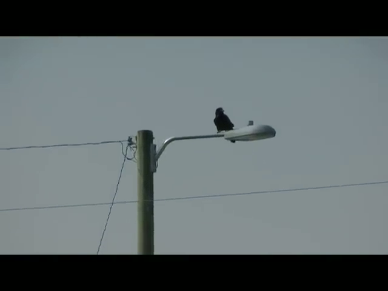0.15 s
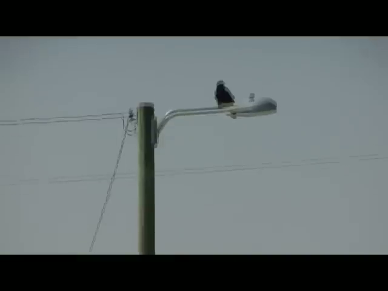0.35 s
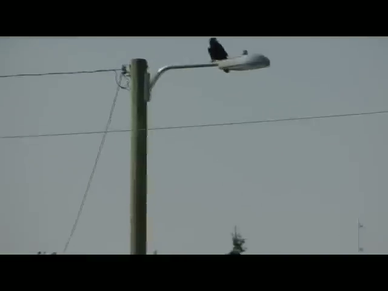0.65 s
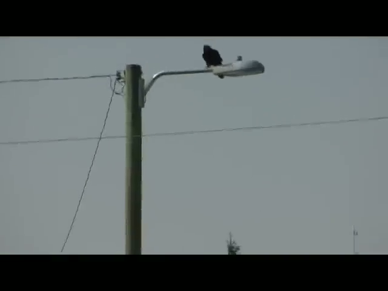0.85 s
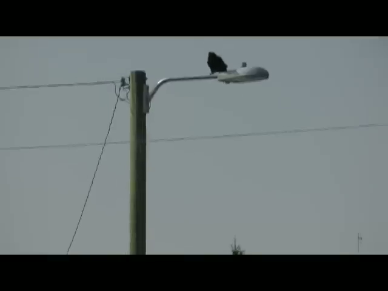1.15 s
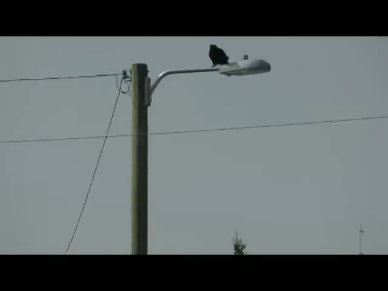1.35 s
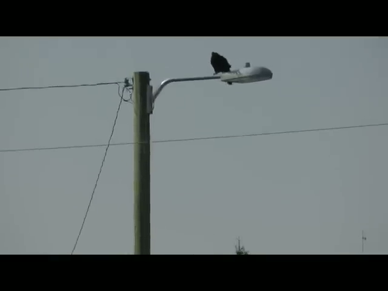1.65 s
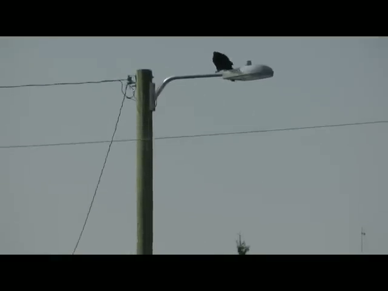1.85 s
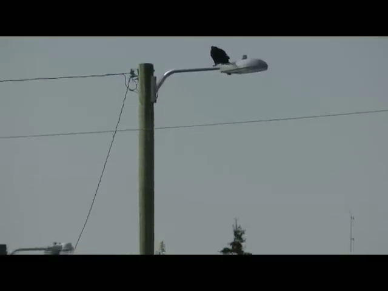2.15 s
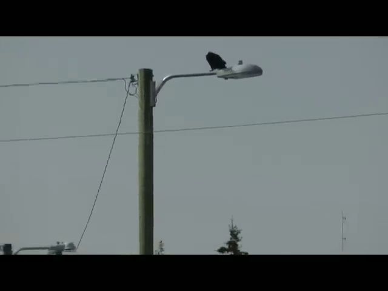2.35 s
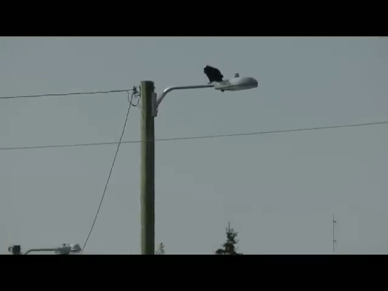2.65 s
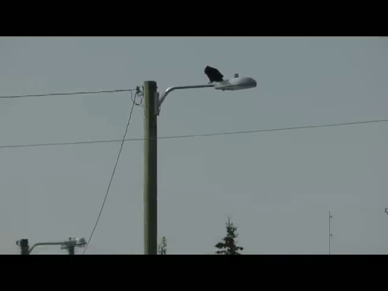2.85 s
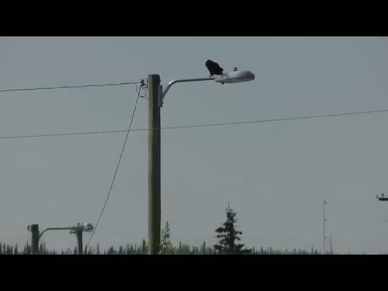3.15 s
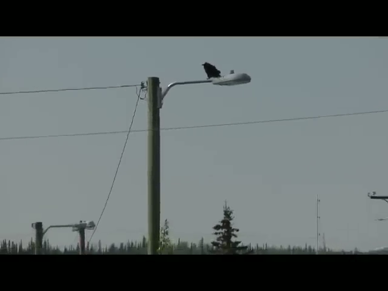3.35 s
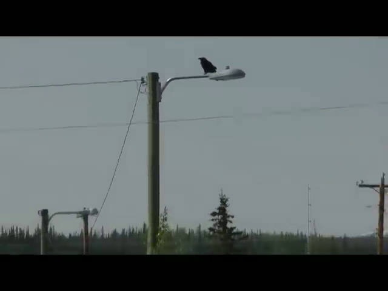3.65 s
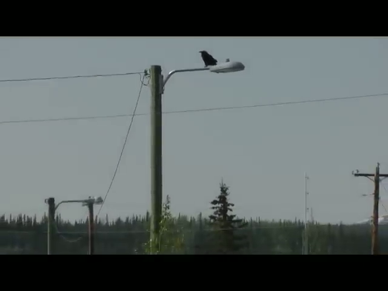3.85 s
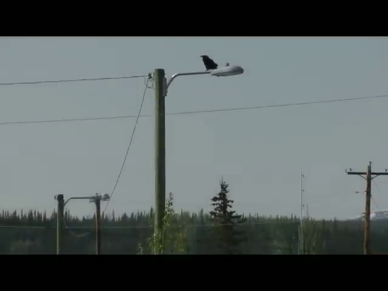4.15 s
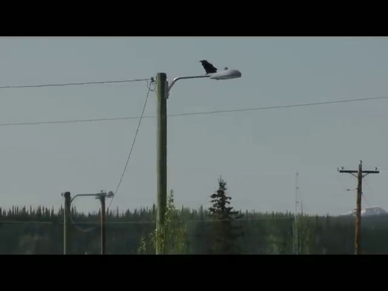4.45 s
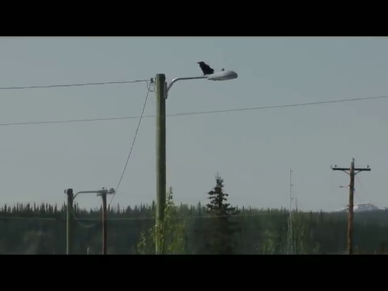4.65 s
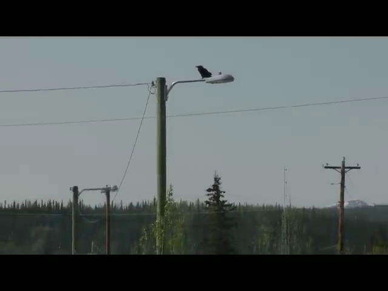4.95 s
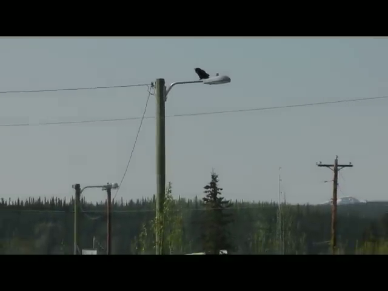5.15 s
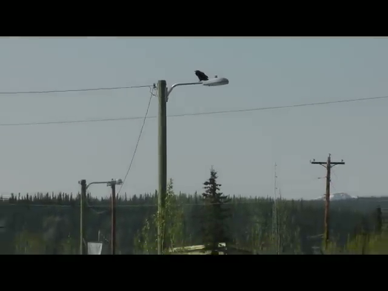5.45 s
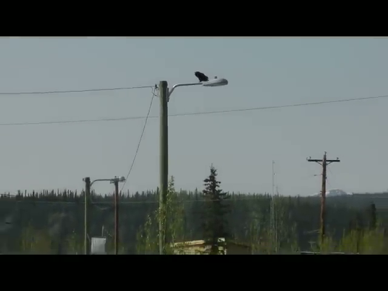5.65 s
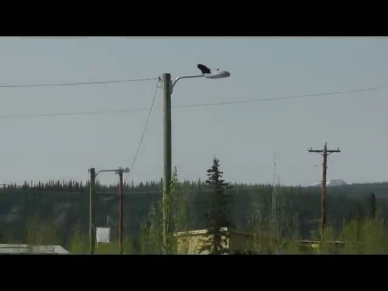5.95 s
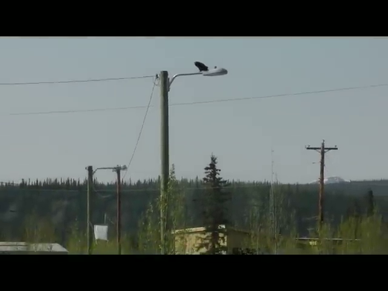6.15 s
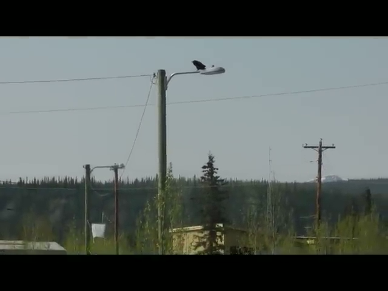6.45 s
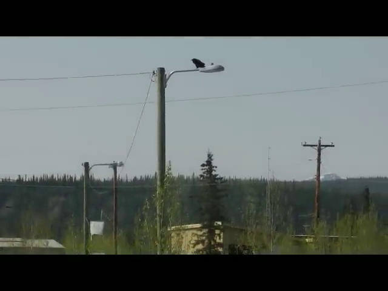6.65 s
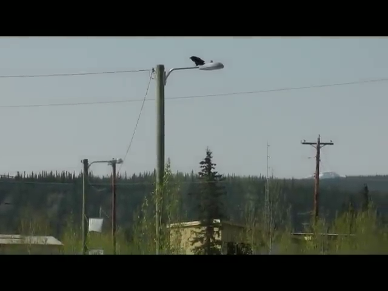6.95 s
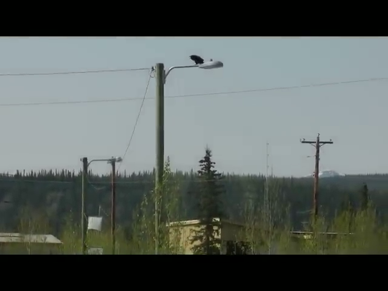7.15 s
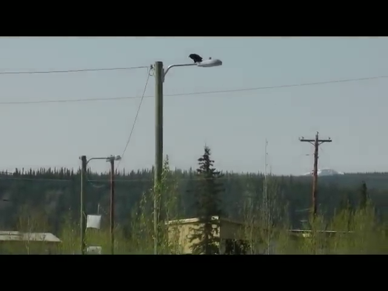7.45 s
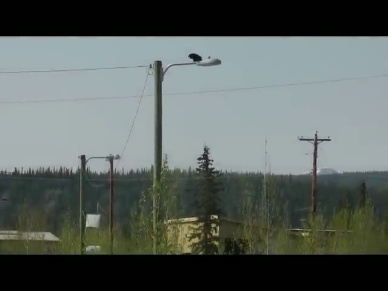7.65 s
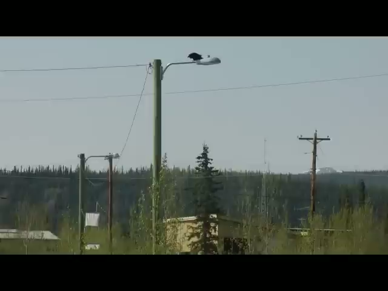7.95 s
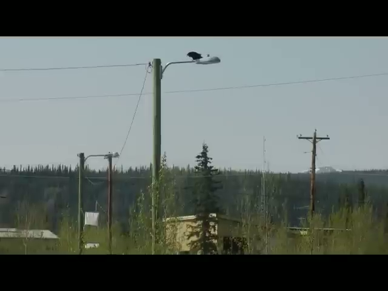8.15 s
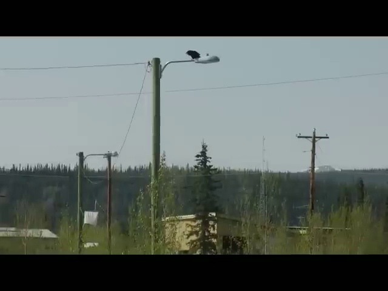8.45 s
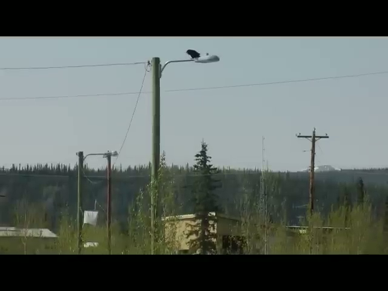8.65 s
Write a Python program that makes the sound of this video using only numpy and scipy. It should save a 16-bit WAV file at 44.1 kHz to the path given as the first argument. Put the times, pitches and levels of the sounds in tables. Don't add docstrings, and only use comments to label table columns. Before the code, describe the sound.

A raven calls from some distance above a handheld stereo microphone, its voice followed by a faint scattered echo from buildings and woods. Paired nasal honks cluster early, with a deep croak before another pair; a calm gap follows, then higher honks, another deep croak, low honks and two strong high rattles. Beneath lie traffic rumble, hiss, rustling leaves, wind bumps, tiny handling creaks and a distant engine rising late.

```python
import sys
import numpy as np
from scipy import signal
from scipy.fft import rfft, irfft, next_fast_len
from scipy.io import wavfile
from scipy.ndimage import uniform_filter1d

SR = 44100
rng = np.random.default_rng(int(sys.argv[2]) if len(sys.argv) > 2 else 0)


def ratio_of_db(decibels):
    return 10 ** (np.asarray(decibels, float) / 20)


def store_wav(level_fs):
    pcm = np.round(np.clip(np.atleast_2d(level_fs), -1, 1) * 32767)
    wavfile.write(sys.argv[1], SR, pcm.T.astype(np.int16))


N = 388962
TIME = np.arange(N) / SR

# t/s, pitch f/Hz, 1st partial level/dB, 2nd partial level/dB
HONKS = [
    [(1.053, 736, -64, -65), (1.065, 744, -45, -34.5), (1.073, 758, -44, -33), (1.093, 763, -41, -34.5),
     (1.102, 744, -43, -32.5), (1.107, 721, -48, -29), (1.114, 716, -43.5, -35.5), (1.143, 697, -56, -53)],
    [(1.171, 720, -63, -57), (1.175, 702, -49, -43), (1.182, 711, -47, -33.5), (1.194, 742, -45.5, -30.5),
     (1.203, 740, -46, -33), (1.207, 736, -47, -35), (1.212, 720, -53, -47), (1.216, 706, -64, -48)],
    [(1.654, 620, -63, -63), (1.668, 690, -50, -39.5), (1.678, 706, -43, -27.5),
     (1.693, 715.4, -42.5, -25.5), (1.706, 742, -40.5, -26.5), (1.717, 741, -41.5, -25.5),
     (1.726, 710, -45.5, -37), (1.737, 676, -61, -52)],
    [(1.76, 701, -52, -52), (1.77, 704, -48.5, -37), (1.774, 703, -52, -43), (1.783, 747, -43, -41),
     (1.793, 751, -40.5, -25.5), (1.797, 750, -41.5, -32), (1.814, 732, -49, -33), (1.831, 696, -62, -52)],
    [(2.158, 807, -57, -60), (2.164, 823, -50, -55), (2.168, 832.5, -44.5, -48), (2.181, 814, -38, -33.5),
     (2.194, 822, -38, -27.5), (2.204, 789, -38.5, -34.5), (2.208, 780, -39, -33.5), (2.24, 734, -67, -62)],
    [(2.272, 800, -61, -52), (2.285, 772, -43, -33), (2.289, 744, -45.5, -44), (2.3, 833, -39, -31.5),
     (2.309, 834, -40, -24.5), (2.316, 830, -39.5, -27), (2.325, 782, -46.5, -56), (2.33, 769, -53, -46)],
    [(3.142, 654, -57, -65), (3.156, 649, -53, -48), (3.162, 674, -56, -46), (3.169, 705, -46, -42),
     (3.187, 690, -43.5, -31.5), (3.201, 711, -42, -32.5), (3.207, 714, -45, -33), (3.232, 704, -64, -41)],
    [(3.281, 731, -64, -64), (3.287, 733, -52, -51), (3.291, 756, -47, -46), (3.302, 775, -43, -48),
     (3.306, 770, -45.5, -41.5), (3.318, 729, -49, -43), (3.322, 718, -52, -48), (3.328, 719, -62, -45)],
    [(5.546, 874, -60, -72), (5.554, 834, -48, -35.5), (5.558, 817, -43, -34.5), (5.565, 795, -42, -42),
     (5.569, 791.6, -40, -39), (5.59, 807, -42, -39.5), (5.603, 796, -40, -54), (5.625, 770, -66, -66)],
    [(5.651, 777, -63, -50), (5.657, 760, -53, -45), (5.662, 772, -46, -40), (5.666, 777, -44, -38),
     (5.672, 771, -39.5, -43), (5.68, 749, -43, -33), (5.701, 745, -53, -43.5), (5.713, 740, -62, -51)],
    [(6.451, 735, -64, -67), (6.457, 628, -47.5, -44.5), (6.463, 626, -49, -42), (6.468, 640, -49.5, -58),
     (6.488, 667, -56, -47), (6.504, 645, -55, -49), (6.511, 626, -62, -41), (6.515, 624, -73, -59)],
    [(6.531, 656, -62, -54), (6.535, 701.6, -54, -63), (6.579, 738, -42, -33), (6.585, 758.5, -41, -33.5),
     (6.589, 758.5, -41, -37.5), (6.605, 739, -46, -30.5), (6.609, 748, -47, -31), (6.622, 677, -51, -43)],]
# level over the 1st partial/dB, drift from start to end/dB
HONK_BRIGHTNESS = [(-13.5, -9), (-7.5, -6), (-3, 7), (-2, 1), (-5.5, -15), (-4, 6), (-8.5, 0), (-13.5, 0),
                   (-13, -20), (-16.5, -5), (-5.5, -8), (-18, 25)]
# level/dB of the 3rd, 4th, 5th .. partial
HONK_COLOURS = [(0, -8, -16, -21, -20, -27, -24), (0, -4, -20, -20, -20, -16, -19),
                (0, -6, -20, -22, -25, -20, -18), (0, -3, -23, -29, -26, -19, -25),
                (-3, 0, -14, -18, -26, -30, -30), (0, -2, -10, -16, -30, -30, -30),
                (0, -9, 0, -6, -22, -22, -28), (0, -7, -6, -9, -29, -30, -28),
                (-2, 0, -10, -19, -30, -30, -30), (0, -3, -25, -22, -30, -25, -30),
                (-1, 0, -22, -30, -30, -21, -21), (0, -2, -12, -24, -22, -20, -23)]
# f/Hz, width/Hz, level/dB
HONK_THROAT = [(2300, 700, 0), (3300, 900, -2), (4600, 900, -6)]
# t/s, attack/s, hold/s, release/s, 2nd partial level/dB
COOS = [
    (7.535, 0.052, 0.017, .08, -60),
    (8.738, 0.0092, 0.0476, 0.04, -76),
]
# first f/Hz, crest f/Hz, last f/Hz, 1st partial level/dB, higher partials level/dB
COO_TUNES = [(654, 622, 564, -46, -67), (770, 680, 700, -38.5, -64)]
# level/dB of the 3rd, 4th .. partial
COO_COLOURS = [(-0.72, 0, -12, -12, -25, -25, -30), (-1, 0, -10, -14, -20, -30, -30)]
DEEP_CROAKS = [
    (2.764, .006, .115, .02, -3),
    (6.044, .005, .105, .02, -3),
]
DEEP_TUNES = [(534, 520, 503, 1, -1.7), (566, 538, 505, 1, -0.99)]
DEEP_COLOURS = [(-9, -11, -6, 0, -12, -17, -12, -18, -12, -19, -24),
                (-1, -6, -2, 0, -6, -9, -14, -17, -20, -24, -27)]
STUTTER = [
    (6.0115, 0.00224, 0.038, 0.0074, 1.7),
]
STUTTER_TUNE = [(559, 580, 680, 3.4, -0.072)]
HIGH_CROAKS = [
    (7.384, .004, .15, .02, -3),
    (8.556, .004, .165, .015, -3),
]
HIGH_TUNES = [(715, 695, 670, -1, -2.3), (751, 733, 733, -0.5, -1.8)]
HIGH_COLOURS = [(-6, 0, -12, -17, -27, -30, -30), (-3, 0, -7, -7, -18, -20, -27)]
# f/Hz, width/Hz, level/dB
DEEP_THROAT = [
    [(1627, 460, -12), (2540, 290, -2), (3150, 240, 0.5), (4640, 230, -10), (5600, 420, -9.5),
     (7630, 4100, -15)],
    [(1103, 270, -4), (1514, 530, -3), (2490, 300, -3.5), (3290, 310, -3), (4500, 580, -12),
     (5570, 600, -19)],
]
HIGH_THROAT = [
    [(950, 330, 0), (1750, 150, -1.5), (2580, 350, 5.5), (3500, 520, -3), (4000, 230, -14)],
    [(1050, 240, -19), (1800, 260, -5.5), (2660, 370, 0), (3650, 560, -6), (4160, 160, -6),
     (6000, 490, -19.5)],
]
# snap t/s, tone delay/s, 1st partial level/dB, 2nd level/dB, higher level/dB
DEEP_BEATS = [(2.771, .005, -54, -33, -42), (2.784, .009, -52, -33, -37), (2.7977, .007, -51, -32, -36),
              (2.8087, .006, -50, -34, -37), (2.8227, .008, -51, -30.5, -36), (2.8372, .004, -51, -31, -38),
              (2.849, .007, -53, -29, -40), (2.8643, .005, -60, -34, -45), (2.876, .005, -62, -43, -52),
              (6.0156, .0015, -47, -42, -39), (6.0307, .0011, -46, -42, -38), (6.041, .0022, -50, -45, -47),
              (6.0535, .0065, -50, -36, -39), (6.066, .008, -47, -33.5, -38), (6.0795, .003, -47, -34, -42),
              (6.0927, .008, -49, -29, -42), (6.1086, .004, -49, -29.5, -43), (6.12, .01, -53, -35, -49),
              (6.134, .006, -55, -41, -52), (6.15, .004, -58, -46, -58)]
HIGH_BEATS = [(7.391, .001, -38.5, -42, -58), (7.4086, .001, -38, -38, -44), (7.422, .001, -48, -50, -49),
              (7.4315, .002, -40, -39, -43), (7.4492, .001, -37, -34, -39), (7.4678, .0013, -38, -38, -43),
              (7.4867, .0005, -38, -35, -44), (7.5062, .002, -40, -41, -46), (7.519, -.0013, -52, -41, -50),
              (7.534, .003, -48, -48, -52), (8.563, .0014, -43, -40, -54), (8.5787, 0, -37, -32, -50),
              (8.5935, .0035, -36, -30, -38.5), (8.6106, .004, -38, -35, -37),
              (8.6238, .002, -35, -29, -38), (8.6367, .002, -37, -29, -35), (8.6509, 0, -38, -29, -36),
              (8.658, 0, -39, -36, -48), (8.670, .0033, -34, -27, -33.5), (8.6915, .002, -36, -29, -36),
              (8.7067, .004, -55, -47, -46), (8.724, -.002, -55, -39, -50)]
SWELL_SHARES = [
    [0.13],
    [0.13],
    [0.1],
]
FOLLOWS = (0.8, 1.4, 1.7)
# t/s, peak level/dB, f/Hz
KNOCKS = [
    (7.349, -43, 1700),
    (7.366, -42, 1720),
    (8.5527, -37.5, 1694),
    (8.559, -36.5, 1750),
]
# delay t/s, level/dB
ECHO = [(0, -21), (.03, -40.5), (.06, -32), (.15, -38.5), (.33, -42.5), (.7, -51), (2.2, -83)]
# f/Hz, level/dB
ECHO_COLOUR = [(400, -9.5), (750, -4.5), (1100, 3), (1400, 1.5), (1650, -6.5), (3000, -0.5), (6000, -12.5)]
# f/Hz, left over right level/dB, left phase lead/rad
PORTS = [(500, -8, .4), (750, -10, .5), (1050, -3, .25), (1500, -3, .55), (3000, -6.5, .15), (6000, -8, .4)]
# t/s, length/s, first f/Hz, last f/Hz, level/dB
CHIRPS = [
    (.335, .02, 3800, 3500, -71),
    (.555, .03, 3900, 3500, -71),
    (.715, .02, 4100, 3700, -70),
    (.765, .025, 3900, 3700, -69),
    (.89, .025, 3600, 3100, -67),
    (.93, .02, 3700, 2800, -69),
    (.975, .02, 3600, 3100, -70),
    (1.033, .025, 3700, 3100, -68),
]
# t/s, level/dB, length/s, low edge f/Hz, high edge f/Hz
CREAKS = [(0.016, -61, 0.0074, 1500, 5970), (0.154, -67, .015, 1800, 6000),
          (0.475, -64.5, 0.011, 1500, 2780), (0.518, -60, 0.023, 1410, 6150),
          (0.97, -62, 0.012, 2800, 8300), (1.13, -65.5, 0.048, 3500, 8600), (1.453, -65, 0.013, 1980, 8020),
          (1.614, -64, 0.028, 2940, 15160), (1.761, -50, 0.00092, 3960, 12000),
          (4.315, -65, 0.032, 2000, 6800), (4.818, -67.5, 0.043, 2540, 7040),
          (5.878, -55, 0.014, 1514, 11000), (6.232, -54, 0.0028, 2000, 4200),
          (7.152, -66.5, 0.04, 3000, 10500)]
# f/Hz, width/Hz, left level/dB, right level/dB
WHINE = [(426, 3., -72, -66.5), (855, 1.5, -77, -65)]
# t/s, firing f/Hz, level/dB
ENGINE = [
    (5.5, 52.3, -73),
    (6.05, 63.5, -67.5),
    (8.82, 75.4, -61.5),
]
# multiple of firing rate, level/dB
ENGINE_ORDERS = [(1, -0.5), (1.5, -11), (2, -14)]
# t/s, f/Hz, level/dB
COASTING = [
    (6.65, 118.5, -63.5),
    (6.866, 103, -63.5),
    (7.25, 93.7, -64),
]
# t/s, level/dB
WIND = [(0.0, -84), (0.19, -88), (.28, -65.5), (.38, -83), (3.14, -89), (3.56, -61.5), (3.76, -80),
        (4.55, -83), (4.66, -57), (4.8, -86), (5.65, -91), (5.77, -70.5), (6.2, -70), (6.6, -78),
        (7.6, -74), (8.28, -81), (8.82, -67)]
# t/s, level/dB
LEAVES = [
    (0, -94),
    (.8, -72),
    (1.2, -65.5),
    (1.6, -68),
    (2.2, -80),
    (8.82, -74.5),
]
# f/Hz, density level/dB per Hz
FLOOR = [(24, -51), (40, -15), (75, -3), (154, -4.5), (295, -7.5), (419, -13), (860, -14.5), (950, -22.5),
         (1390, -20), (1700, -16), (3000, -19.5), (7000, -25), (9000, -26.5), (15700, -25.5)]
# f/Hz, left over right level/dB
FLOOR_BALANCE = [(60, -1), (400, 1), (700, -4), (1300, -4), (6500, -9), (8500, -3), (10500, -33),
                 (15000, -16)]
# f/Hz, left-right likeness (-1..1)
FLOOR_LIKENESS = [(60, 0.56), (130, 0.55), (290, -0.22), (640, -0.33), (1410, 0.076), (3100, 0.068),
                  (6820, 0.0053), (15000, 0.57)]


def raven():
    honks = voice(honked(HONKS, HONK_BRIGHTNESS), HONK_COLOURS,
                  throats=[HONK_THROAT] * len(HONK_COLOURS), air_db=-20.5)
    coos = voice(sung(COOS, COO_TUNES), COO_COLOURS)
    push, pulse = rattle(DEEP_BEATS, (.5, .42, .78))
    deep = voice(sung(DEEP_CROAKS, DEEP_TUNES), DEEP_COLOURS, pulse, push,
                 jitter=.013, bend=.02, throats=DEEP_THROAT, air_db=-1, sag_db=-14)
    stutter = voice(sung(STUTTER, STUTTER_TUNE), DEEP_COLOURS[1:], pulse, push,
                    jitter=.026, bend=.03, throats=DEEP_THROAT[1:], air_db=3)
    push, pulse = rattle(HIGH_BEATS, (.8, .86, .78))
    high = voice(sung(HIGH_CROAKS, HIGH_TUNES), HIGH_COLOURS, pulse, push,
                 jitter=.02, bend=.02, throats=HIGH_THROAT, air_db=5)
    return honks + coos + deep + stutter + high + beak_knocks()


def honked(notes, brightness):
    curves = []
    for rows, (over_db, lean_db) in zip(notes, brightness):
        s, hz, first_db, second_db = np.transpose(rows)
        peak_db = first_db.max()
        part = (s - s[0]) / (s[-1] - s[0])
        upper_db = peak_db + over_db + 1.06 * (first_db - peak_db) + lean_db * (part - .5)
        curves.append(np.column_stack([s, hz, first_db, second_db, upper_db]))
    return curves


def sung(notes, tunes):
    curves = []
    for note, tune in zip(notes, tunes):
        s, attack_s, hold_s, release_s, second_db = note
        first_hz, crest_hz, last_hz, first_db, upper_db = tune
        length_s = attack_s + hold_s + release_s
        crest_s = attack_s + 0.695 * hold_s
        age = np.linspace(0, length_s, num=60)
        effort = np.minimum(age / attack_s, (length_s - age) / release_s)
        effort_db = 20 * np.log10(np.clip(effort, .03, 1))
        before = np.maximum(1 - age / crest_s, 0)
        after = np.maximum(age - crest_s, 0) / (length_s - crest_s)
        hz = crest_hz + (first_hz - crest_hz) * before ** 2.35 + (last_hz - crest_hz) * after ** 1.02
        levels_db = np.array([[first_db], [second_db], [upper_db]]) + np.outer(FOLLOWS, effort_db)
        levels_db[1] += .7 * drift(34, size=SR // 4)[(age * SR).astype(int)]
        curves.append(np.column_stack([s + age, hz, *levels_db]))
    return curves


def rattle(beats, depths):
    shape = np.zeros((3, N))
    starts = np.array(beats)[:, 0]
    gaps = np.clip(np.diff(starts, append=9), .01, .02)
    gaps = gaps * np.where(starts > 8, 1.2, 1)
    for (s, later_s, *levels_db), gap_s in zip(beats, gaps):
        at = slice(round((s - .02) * SR), round((s + .06) * SR))
        delay_s = later_s * np.array([[1], [1], [0]])
        swell_s = gap_s * np.array(SWELL_SHARES)
        age = np.maximum((TIME[at] - s - delay_s) / swell_s + 2, 0)
        shape[:, at] += ratio_of_db(np.array(levels_db)[:, None]) * (age / 2) ** 2 * np.exp(2 - age)
    depths = np.clip(depths, 0, 1)[:, None]
    mean = np.maximum(uniform_filter1d(shape, size=700, axis=1), 0)
    pulse = shape[2] / (mean[2] + 1e-5)
    return depths * shape + (1 - depths) * mean, pulse


def voice(notes, colours, pulse=np.ones(N), pressures=np.ones((3, N)), jitter=.002, bend=0,
          throats=None, air_db=0, sag_db=0):
    out = np.zeros(N)
    for rows, colour, throat in zip(notes, colours, throats or [()] * len(notes)):
        rows = np.array(rows)
        rows[:, 2:] = ratio_of_db(rows[:, 2:])
        at, (hz, *gains), gate = played(rows, fade_s=0.0031)
        wobble = jitter * drift(70.6, size=len(at)) + bend * (pulse[at] - 1)
        turns = np.cumsum(hz * (1 + wobble)) / SR
        multiples = 3 + np.arange(len(colour))[:, None]
        flicker_db = 2.5 * np.array([drift(50, size=len(at)) for _ in colour])
        partials = np.sin(2 * np.pi * multiples * turns + multiples ** 2)
        upper = rms_one(np.sum(ratio_of_db(np.array(colour)[:, None] + flicker_db) * partials, axis=0))
        upper += breath(throat, len(at), air_db, sag_db)
        upper = upper / np.sqrt(uniform_filter1d(upper ** 2, size=260) + .05 * np.mean(upper ** 2))
        first = np.sqrt(2) * np.sin(2 * np.pi * turns)
        second = np.sqrt(2) * np.sin(4 * np.pi * turns)
        for layer, gain, pressure in zip((first, second, rms_one(upper)), gains, pressures):
            out[at] += gain * gate * layer * pressure[at]
    return out


def breath(throat, size, air_db, sag_db):
    turbulence = rng.standard_normal(size)
    out = np.zeros(size)
    course = np.linspace(-.3, 1, num=size) ** 3
    for peak_hz, width_hz, db in throat:
        ringing = resonance(resonance(turbulence, peak_hz, width_hz), peak_hz, width_hz)
        tilt_db = sag_db * np.log2(peak_hz / 2800) * course
        out += ratio_of_db(db + air_db + tilt_db) * rms_one(ringing)
    return out


def resonance(x, hz, width_hz):
    r = np.exp(-np.pi * width_hz / SR)
    poles = [1, -2 * r * np.cos(2 * np.pi * hz / SR), r * r]
    return signal.lfilter([(1 - r * r) / 2, 0, (r * r - 1) / 2], poles, x)


def beak_knocks():
    out = np.zeros(N)
    for s, db, hz in KNOCKS:
        burst = np.exp(-((TIME - s - .003) / 0.0019) ** 2)
        out += ratio_of_db(db) * burst * np.sin(2 * np.pi * hz * TIME)
    return out


def outdoors(x):
    size = next_fast_len(N + 3 * SR)
    hz = np.arange(size // 2 + 1) * SR / size
    ratio = ratio_of_db(at_hz(PORTS, hz))
    lead = np.exp(1j * at_hz(PORTS, hz, column=2))
    ports = np.array([ratio * lead, np.ones(len(hz))]) * 2 / (1 + ratio)
    delay_s = np.arange(round(ECHO[-1][0] * SR)) / SR
    lumps_db = np.interp(delay_s, *np.transpose(ECHO)) - 14 + 1.5 * drift(20, size=len(delay_s))
    common, left, right = rng.standard_normal((3, len(delay_s))) * ratio_of_db(lumps_db)
    scatter = np.array([0.38 * common + 0.54 * left, 0.94 * common + 0.57 * right])
    wash = rfft(scatter, size) * ratio_of_db(at_hz(ECHO_COLOUR, hz))
    return irfft(rfft(x, size) * ports * (1 + wash), size)[:, :N]


def songbirds():
    out = np.zeros(N)
    for s, length_s, first_hz, last_hz, db in CHIRPS:
        at = slice(round(s * SR), round((s + length_s) * SR))
        part = np.clip((TIME[at] - s) / length_s, 0, 1)
        hz = last_hz + (first_hz - last_hz) * (1 - part) ** 2
        out[at] += ratio_of_db(db) * np.sin(np.pi * part) * np.sin(2 * np.pi * np.cumsum(hz) / SR)
    return out * ratio_of_db([[-3], [2]])


def hand_creaks():
    out = np.zeros(N)
    grit = rng.standard_normal(N) * ratio_of_db(3.0 * drift(600))
    for s, db, length_s, low_hz, high_hz in CREAKS:
        at = slice(max(round((s - .05) * SR), 0), round((s + .12) * SR))
        puff = np.exp(-((TIME[at] - s - length_s / 2) / (0.83 * length_s)) ** 2)
        out[at] += ratio_of_db(db) * rms_one(band(grit[at], low_hz, high_hz)) * puff
    return out * ratio_of_db([[-3], [2]])


def camera_motor():
    out = np.zeros((2, N))
    for hz, width_hz, left_db, right_db in WHINE:
        turns = np.cumsum(hz + width_hz * drift(13.2)) / SR
        tone = np.sqrt(2) * np.sin(2 * np.pi * turns) * ratio_of_db(2.0 * drift(9.8))
        out += tone * ratio_of_db([[left_db], [right_db]]) * [[-1], [1]]
    return out


def far_engines():
    out = np.zeros((2, N))
    for rows, orders in ((ENGINE, ENGINE_ORDERS), (COASTING, ENGINE_ORDERS[:1])):
        at, (hz, db), gate = played(rows, fade_s=0.057)
        turns = np.cumsum(hz) / SR
        hum = sum(ratio_of_db(order_db) * np.sin(2 * np.pi * k * turns) for k, order_db in orders)
        out[:, at] += np.sqrt(2) * gate * ratio_of_db(db) * hum
    return out


def wind():
    return ratio_of_db(np.interp(TIME, *np.transpose(WIND)) + 9.0) * np.array([drift(60), drift(40.5)])


def leaves():
    rustle = np.zeros(N)
    for hz in (1730, 2320, 3200, 4560):
        rustle += ratio_of_db(4.5 * drift(12.0)) * band(rng.standard_normal(N), hz, 1.38 * hz)
    return ratio_of_db(np.interp(TIME, *np.transpose(LEAVES))) * rms_one(rustle) * ratio_of_db([[-3], [2]])


def traffic_and_hiss():
    one, other = rfft(rng.standard_normal((2, N)))
    hz = np.arange(len(one)) * SR / N
    alike = np.clip(at_hz(FLOOR_LIKENESS, hz), -.95, .95)
    ratio = ratio_of_db(at_hz(FLOOR_BALANCE, hz))
    pair = np.array([ratio * one, alike * one + np.sqrt(1 - alike ** 2) * other])
    mono_gain = np.sqrt(1 + ratio ** 2 + 2 * alike * ratio)
    pair = irfft(pair * ratio_of_db(at_hz(FLOOR, hz)) / mono_gain, N)
    return ratio_of_db(-61.5) * pair / np.std(pair.mean(axis=0))


def rms_one(x):
    return x / np.sqrt(np.mean(x ** 2) + 1e-20)


def at_hz(points, hz, column=1):
    points = np.array(points)
    return np.interp(np.log(np.maximum(hz, 1)), np.log(points[:, 0]), points[:, column])


def band(x, low_hz, high_hz):
    edges = [low_hz, min(high_hz, .45 * SR)]
    return signal.sosfilt(signal.butter(2, edges, "band", fs=SR, output="sos"), x)


def drift(rate, size=N):
    return rms_one(band(rng.standard_normal(size + SR // 4), rate / 4, rate)[SR // 4:])


def played(rows, fade_s):
    s, *columns = np.transpose(rows)
    end = round(s[-1] * SR)
    at = np.arange(round(s[0] * SR), min(end, N))
    to_end = end - at + SR * (at[-1] > N - 20)
    gate = np.clip(np.minimum(at - at[0], to_end) / (fade_s * SR), 0, 1)
    return at, [np.interp(TIME[at], s, c) for c in columns], gate


def scene():
    near = outdoors(raven()) + songbirds() + hand_creaks() + camera_motor()
    return near + far_engines() + wind() + leaves() + traffic_and_hiss()


def band_limit(x):
    return signal.sosfilt(signal.butter(12, 15830, fs=SR, output="sos"), x)


def record(dry):
    low_pass = signal.cheby2(14, 60, 1.01 * 15800, fs=SR, output="sos")
    mix = signal.sosfilt(low_pass, dry)
    return band_limit(mix)


dry = scene()
out = record(dry)
store_wav(out)
```